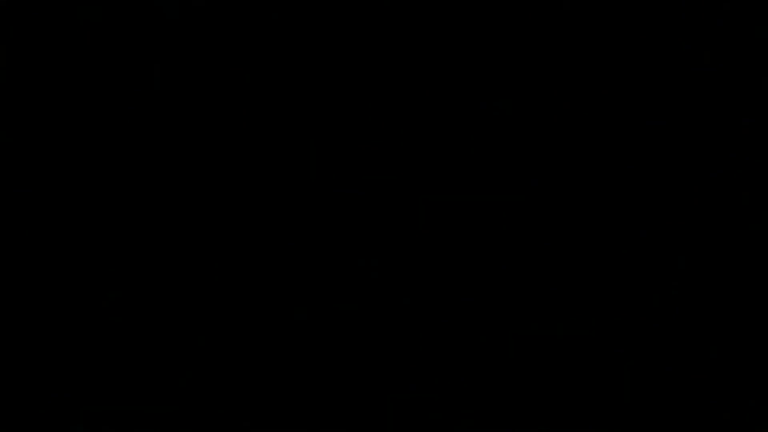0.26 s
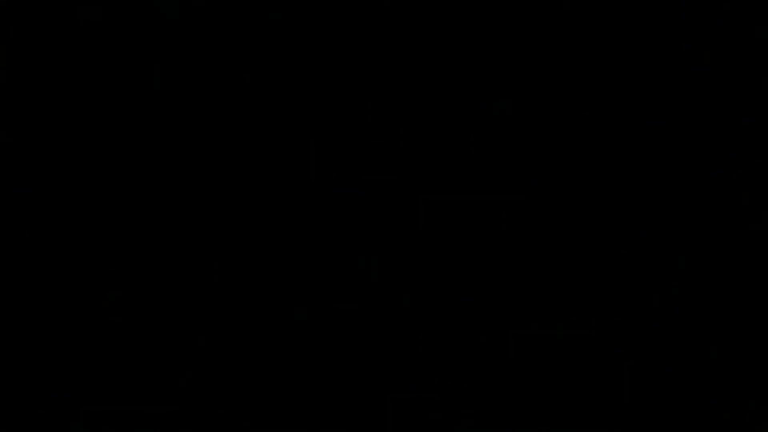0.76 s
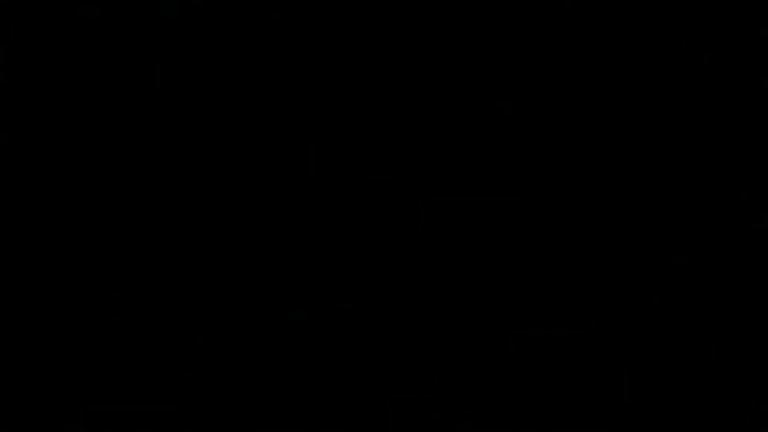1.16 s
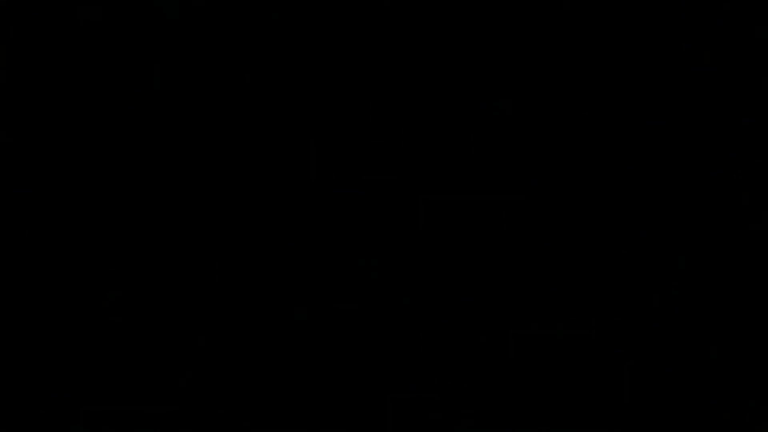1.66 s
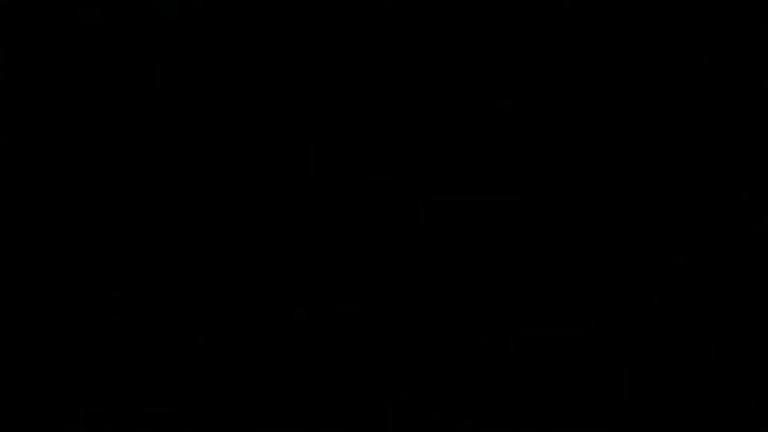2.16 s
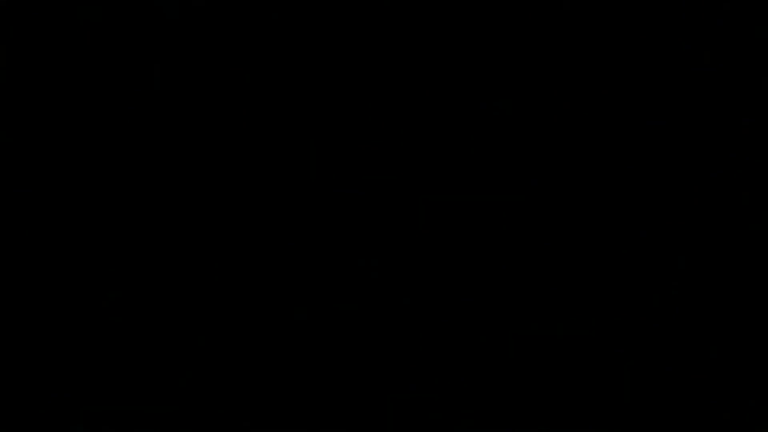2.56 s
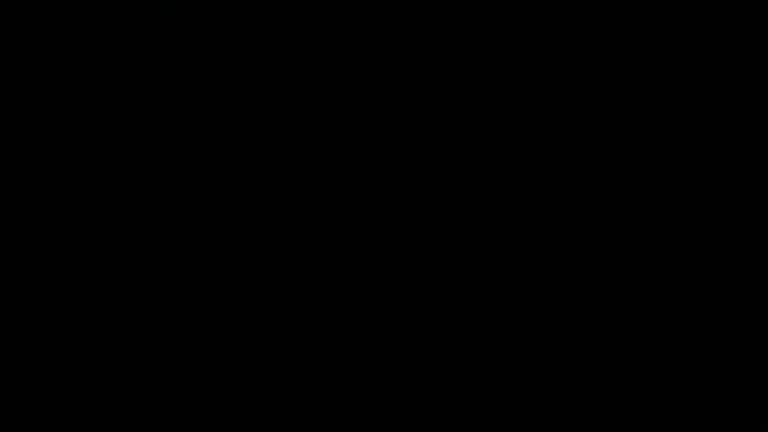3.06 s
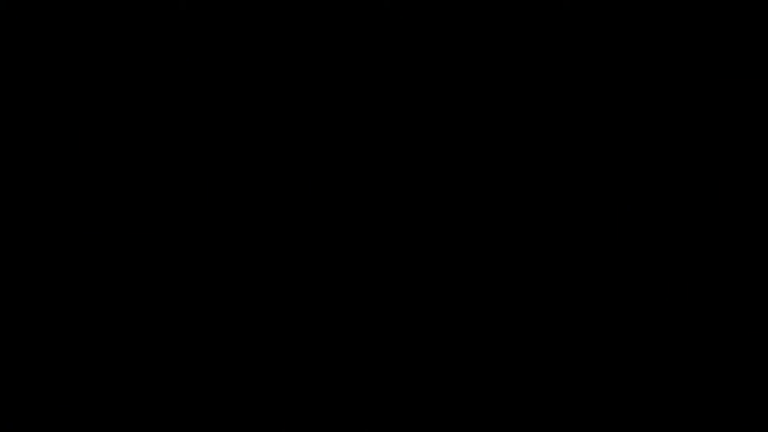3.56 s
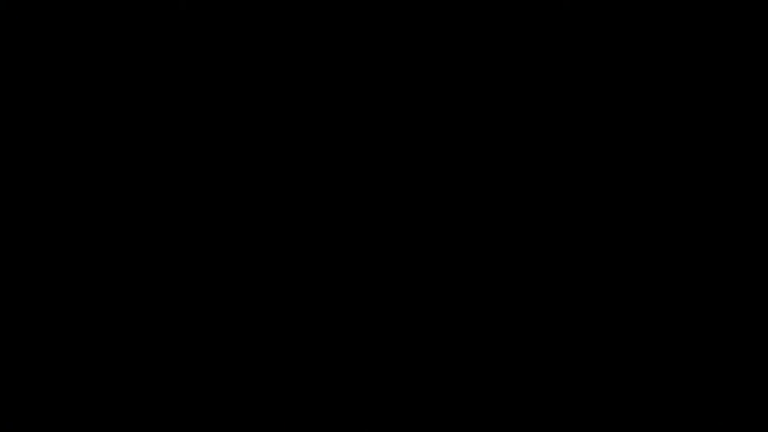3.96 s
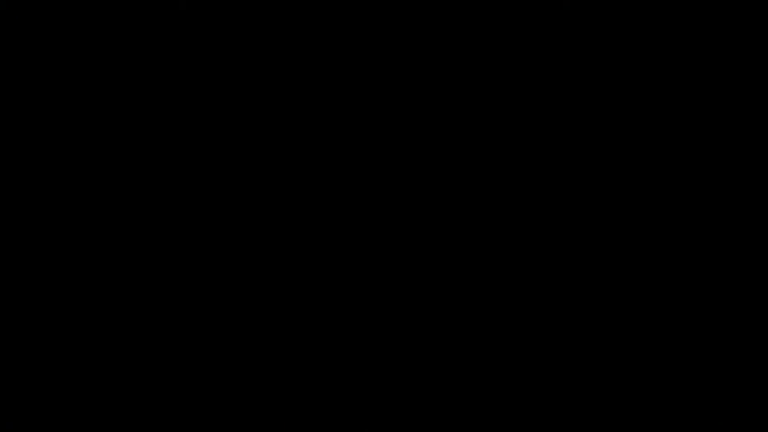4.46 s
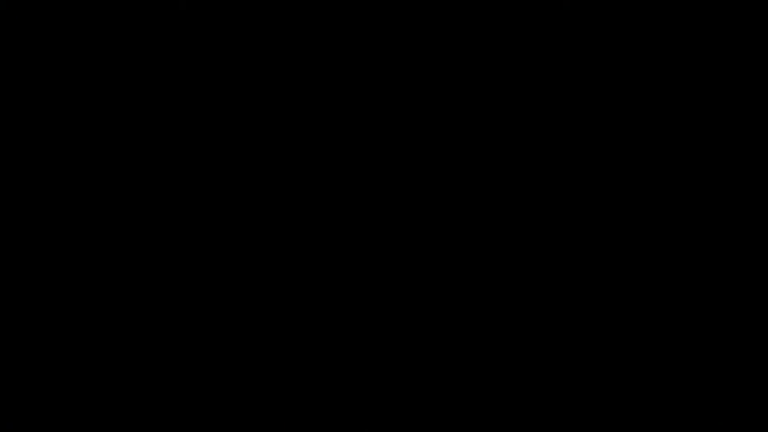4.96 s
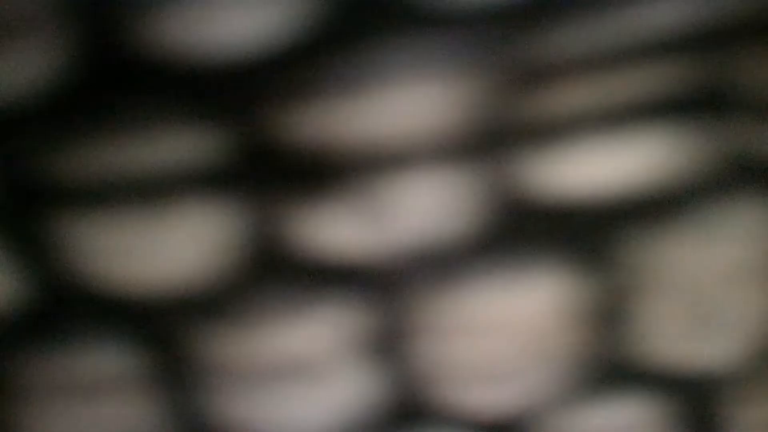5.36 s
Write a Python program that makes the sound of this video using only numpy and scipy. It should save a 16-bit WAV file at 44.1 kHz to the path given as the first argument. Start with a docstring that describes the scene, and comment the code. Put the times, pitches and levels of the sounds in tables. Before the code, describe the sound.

Close stereo recording in a small room. Plastic switch clicks and handling knocks come first, then a vacuum cleaner hums and whines upward. Suction squeals in rising, breathy whistles until a soft thump and gulp of air silence them, leaving roar and hiss. After about a second another puff and bump start a small engine, clattering and gulping about nine times a second to the end.

```python
"""Vacuum cleaner drives a toy air engine

In a small room, switch clicks (short rings and noise) come first, then mains hum (sines) and a motor
running up (sines tied to its speed, shaped noise). Rising suction whistles through gaps (gliding tones)
until the piston is pulled home with a thump. The flywheel is flicked and the engine runs at about nine
turns a second: gulps of air (noise swells), pressure pushes (pulses) and knocking links (short rings).
"""
import sys
import numpy as np
from scipy import signal
from scipy.fft import rfft, irfft, next_fast_len
from scipy.io import wavfile
from scipy.ndimage import map_coordinates

SR = 44100
rng = np.random.default_rng(int(sys.argv[2]) if len(sys.argv) > 2 else 0)


def wav_out(sig):
    """Save sig, one row per channel (or a flat mono array), as 16-bit PCM at SR to the path in sys.argv[1]."""
    wavfile.write(sys.argv[1], SR, np.round(np.clip(np.atleast_2d(sig).T, -1, 1) * 32767).astype(np.int16))


N = 246586
T = np.arange(N) / SR  # time of each sample, s
SIDES = np.array([[0.5], [-0.5]])  # shares a left-minus-right difference between the channels

TOP_HZ = 15900  # upper limit of the sound
POWER_S, LOADED_HZ = 0.7, 328  # the motor gets power; its full speed under the air load, turns a second

# The flywheel from its first turn. Each row: time in seconds, turns a second.
FLYWHEEL = [(3.229, 6.31), (3.32, 7.88), (3.41, 9.9), (3.5, 8.3), (4.0, 8.87), (4.17, 9.46), (4.65, 9.14),
            (5.6, 9.2)]
# The microphones turn past the engine. Each row: time in seconds, left minus right in dB.
VIEW = [(3.1, 0), (4.8, 0.5), (5.5, -5.5)]


def amp(db):
    """Decibels to gain."""
    return 10 ** (np.asarray(db) / 20)


def unit(x):
    """Scaled to rms 1."""
    return x / np.sqrt(np.mean(x ** 2) + 1e-20)


def along(points, hz):
    """Reads a curve of (Hz, value) points on a log pitch axis."""
    f, v = np.transpose(points)
    return np.interp(np.log(hz + 1), np.log(f + 1), v)


def curves(rows):
    """One value per sample for each column after the time."""
    s, *cols = np.transpose(rows)
    return [np.interp(T, s, c) for c in cols]


def wobble(rate, size=N):
    """A smooth random curve with rate random points a second."""
    points = rng.standard_normal(int(N * rate / SR) + 4)
    return map_coordinates(points, [np.arange(size) * rate / SR])


def step(x, centre, width):
    """A smooth step from 0 to 1."""
    return 0.5 + 0.5 * np.tanh((x - centre) / (2 * width))


def filtered(x, response):
    """Multiplies the spectrum of x by a response that depends on frequency."""
    m = next_fast_len(N + SR // 4)
    return irfft(rfft(x, m) * response(np.fft.rfftfreq(m, 1 / SR)), m)[..., :N]


def pan(left_db):
    """Gains of the two channels, left_db apart."""
    return amp(left_db * SIDES)


def from_left(x, lead):
    """The sound reaches the left microphone lead seconds before the right."""
    return filtered(x, lambda hz: np.exp(2j * np.pi * hz * lead * SIDES))


def white(alike, size=N):
    """Stereo white noise whose channels have the share alike in common."""
    share = np.clip(alike, 0, 1)
    common = np.sqrt(share) * rng.standard_normal(size)
    return common + np.sqrt(1 - share) * rng.standard_normal((2, size))


def noise(spectrum, alike):
    """Stereo noise of rms 1, coloured by (Hz, dB) points."""
    return unit(filtered(white(alike), lambda hz: amp(along(spectrum, hz))))


def add(track, s, sound):
    """Mixes a sound into the track at time s."""
    start = max(round(s * SR), 0)
    part = track[..., start:start + sound.shape[-1]]
    part += sound[..., :part.shape[-1]]


def swells(rows):
    """Sum of bell-shaped swells (s, half width s, height)."""
    track, t = np.zeros(N), np.arange(SR // 5) / SR - 0.1
    for s, width, height in rows:
        add(track, s - 0.1, height * np.exp(-0.5 * (t / width) ** 2))
    return track


def ring(modes, scatter, spread):
    """One blow sets off fading sines, with slightly new pitches and strengths, in each channel's own phase."""
    t = np.arange(SR // 6) / SR
    hz, db, t60 = np.transpose(modes)[..., None]
    hz = hz * (1 + scatter * rng.standard_normal(hz.shape))
    size = amp(db + 3 * rng.standard_normal(hz.shape) - 60 * t / t60)
    phase = rng.uniform(0, 2 * np.pi, hz.shape) + spread * rng.standard_normal((2, len(modes), 1))
    tones = (size * np.sin(2 * np.pi * hz * t + phase)).sum(1)
    return tones * (1 - np.exp(-t / 0.00064)) / np.linalg.norm(amp(db))


def struck(modes, hz, focus_db, reach):
    """The place of a blow favours the modes within about reach octaves of hz."""
    return [(f, db + focus_db * np.exp(-(np.log2(f / hz) / reach) ** 2), t60) for f, db, t60 in modes]


def lift(peaks, hz):
    """Gain of a tone that glides through (Hz, half width Hz, dB) resonances."""
    return 1 + sum(amp(db) / (1 + ((hz - centre) / width) ** 2) for centre, width, db in peaks)


def resonances(peaks, hz):
    """Response of (Hz, width Hz, dB) resonances."""
    return sum(amp(db) * 1j * hz * w / (c * c - hz * hz + 1j * hz * w) for c, w, db in peaks)


def shaft_speed():
    """Turns a second of the motor: it picks up softly and heads for its free speed until air load holds it."""
    pickup_s, soft_s, run_up_s, free_hz = 0.89, 0.1, 0.943, 345
    running = soft_s * np.logaddexp(0, (T - pickup_s) / soft_s)
    return np.minimum(free_hz * (1 - np.exp(-running / run_up_s)), LOADED_HZ)


def surge():
    """Gain of the airflow, which swells once."""
    middle_s, width_s, height_db = 2.53, 0.049, 2.5
    return amp(height_db * np.exp(-0.5 * ((T - middle_s) / width_s) ** 2))


def turns():
    """Adds up the flywheel's speed to find each time it comes round: (s, push dB, clatter dB, gulp dB)."""
    # How hard the engine works. Each row: time in seconds, push in dB, clatter in dB, gulp in dB.
    effort = [(3.23, -0.5, -3.5, 2.5), (3.36, 0, -1, 0), (3.47, 0.5, -1, 3), (3.82, 2, 1, 2.5),
              (4.3, 3.5, -0.5, 2.5), (5.2, 1, 3.3, 1.5), (5.55, 2, 1, -0.5)]
    first = round(FLYWHEEL[0][0] * SR)
    done = np.cumsum(curves(FLYWHEEL)[0][first:]) / SR
    at = first + np.searchsorted(done, np.arange(done[-1]))
    return list(zip(at / SR, *[db[at] for db in curves(effort)]))


def background():
    """A faint steady noise, strongest in the bass."""
    spectrum = [(30, -18), (100, -5), (200, -1.5), (500, -20), (2000, -22), (8000, -36)]
    return amp(-71.5) * noise(spectrum, alike=0.38)


def switch():
    """Handling and switch clicks: a plastic snap, the ring of the casing and a thud of the hollow shell."""
    # Each row: start in seconds, level in dB, thud in dB and snap in dB (both relative to the level),
    # time for the snap to fall 60 dB in seconds, pitch that rings most in Hz.
    clicks = [(0.13, -59.5, -11, -7, 0.046, 1500), (0.185, -26.5, -12, -30, 0.1, 1550),
              (0.215, -29.5, -13, -11.5, 0.063, 1600), (0.3, -25.5, -19, -4, 0.037, 1410),
              (0.478, -36, -5, 2, 0.045, 1370), (0.521, -23, -9, -14, 0.054, 1500),
              (0.526, -23.5, -29, -11, 0.028, 1100), (0.652, -33.5, -37, -13, 0.019, 1120),
              (0.667, -45, -25, -17, .025, 1080), (0.697, -37.5, -5, -15, 0.065, 1230),
              (0.719, -51.5, 4, -4, 0.061, 1200), (0.929, -41, -15, -7.5, 0.02, 1280)]
    # The casing's ringing pitches. Each row: pitch in Hz, level in dB, time to fall 60 dB in seconds
    # (before the extra damping below).
    casing = [(780, -4.5, 0.034), (958, -1, 0.11), (1166, -5, 0.064), (1438, -6.5, 0.066),
              (1650, -5.5, 0.054), (2040, -2, 0.038)]
    # The cleaner's hollow shell. Each row: pitch in Hz, level in dB, time to fall 60 dB in seconds.
    hollow = [(206, -5, 0.26), (254, -0.5, 0.049), (325, -6, 0.15), (403, -6.5, 0.081), (633, -7.5, 0.043)]
    # Colour of the snap. Each row: frequency in Hz, level in dB.
    snap_colour = [(100, -42), (500, -3.5), (1500, -1), (3200, 1), (5000, -11), (8000, -30.5), (15000, -40)]
    body, snaps, t = np.zeros((2, N)), np.zeros((2, N)), np.arange(SR // 10) / SR
    for s, db, thud_db, snap_db, snap_t60, hz in clicks:
        modes = struck(casing, hz, focus_db=6.5, reach=0.3)
        rattle = ring(modes, scatter=0.031, spread=0.75)[:, :len(t)] * amp(-350 * t)
        add(body, s, amp(db - 2) * pan(4.2) * rattle)
        add(body, s, amp(db + thud_db + 6.5) * ring(hollow, scatter=0.039, spread=0.2))
        add(snaps, s, amp(db + snap_db + 9) * white(0.5, size=len(t)) * amp(-60 * t / snap_t60))
    sound = body + pan(2.1) * filtered(snaps, lambda hz: amp(along(snap_colour, hz)))
    # small parts radiate little bass
    return filtered(from_left(sound, lead=0.00059), lambda hz: (1j * hz / (1j * hz + 90)) ** 2)


def mains_hum():
    """Mains current hums at steady pitches; the motor draws less of it at full speed."""
    # Each row: pitch in Hz, level in dB before it eases with speed.
    mains = [(100, -53), (200, -49.5)]
    ease_db = 6
    speed = shaft_speed() / LOADED_HZ
    hum = sum(amp(db - ease_db * speed + wobble(6.25)) * np.sin(2 * np.pi * hz * T) for hz, db in mains)
    fade_in = 1 - np.exp(-np.maximum(T - POWER_S, 0) / 0.3)
    return np.sqrt(2) * fade_in * hum


def shaft_tones():
    """The unbalanced rotor and the fan blades sound at multiples of the shaft's speed."""
    # Resonances the shaft passes through. Each row: pitch in Hz, half width in Hz, lift in dB.
    mounts = [(78, 11, 12), (230, 12, 3), (290, 31, 6)]
    # Fan blade tones. Each row: multiple of the shaft's speed, level in dB at full speed before the lift.
    orders = [(9, -52), (10, -55), (11, -57), (18, -60)]
    # The housing lifts tones gliding through it. Each row: pitch in Hz, half width in Hz, lift in dB.
    whine_peaks = [(2570, 46, 7.5), (3560, 50, 4)]
    shaft_hz = shaft_speed()
    speed = shaft_hz / LOADED_HZ
    angle = 2 * np.pi * np.cumsum(shaft_hz * (1 + 0.00211 * wobble(14))) / SR
    # the rotor's shake grows with the square of speed
    shake = amp(-48.5) * speed ** 2 * lift(mounts, shaft_hz)
    shaft = shake * amp(0.79 * wobble(6.8)) * np.sin(angle)
    # twice the shaft's pitch booms as it sweeps through the shell's resonance at 235 Hz
    boom = amp(-55.5) * np.sin(2 * angle) / np.hypot(1, (2 * shaft_hz - 235) / 22)
    boom = boom * step(T, POWER_S, 0.02)
    whine = np.zeros(N)
    for k, db in orders:
        level = amp(db + 1.5 * wobble(20)) * lift(whine_peaks, k * shaft_hz)
        whine += speed ** 3 * level * np.sin(round(k) * angle)
    return np.sqrt(2) * (pan(-6.5) * shaft + boom + whine)


def fan_roar():
    """Fan noise resounds in the ducts and brightens with speed; it climbs as the fan takes hold."""
    # Colour of the rushing air. Each row: frequency in Hz, level in dB.
    roar_colour = [(380, -21), (470, -14.5), (720, -5.5), (950, -7), (1500, -8), (2150, -3), (2750, -11.5),
                   (3300, -11.5), (4000, -7), (4800, -13.5), (5600, -8.5), (6400, -45), (12000, -55)]
    # Hose and fan housing. Each row: pitch in Hz, width in Hz, level in dB.
    ducts = [(1479, 51, 4), (1720, 19, 1), (2396, 60, 1.5), (3030, 23, 0), (3390, 16, -3), (4460, 28, -2.5),
             (5852, 60, -1)]
    # Low drone. Each row: frequency in Hz, level in dB.
    drone_colour = [(25, -53), (60, -17), (100, -9), (140, -11), (210, 9.5), (280, -6), (380, -11),
                    (600, -68)]
    shell_colour = [(300, -7), (460, -4.5), (620, -5), (950, -4), (1500, -7), (2000, -14), (3000, -16),
                    (5000, -49)]
    level_db, climb_db, ease_db = -32.5, 33, 4.5  # it eases with speed as the suction builds
    grip_speed, grip_width = 0.29, 0.093  # where it climbs, as shares of full speed
    bright_hz, bright_power = 4600, 1.3  # above this pitch the air noise grows as a further power of speed
    speed = shaft_speed() / LOADED_HZ
    # the ducts resound less once the engine runs
    duct_db = 3 - 3.5 * step(T, FLYWHEEL[2][0], 0.1)
    duct_noise = unit(filtered(white(0.083), lambda hz: resonances(ducts, hz)))
    air = speed * (amp(3.5) * noise(roar_colour, alike=0.89) + amp(duct_db) * speed ** 0.88 * duct_noise)
    dull = filtered(air, lambda hz: 1 / (1 + (hz / bright_hz) ** 8))
    air = dull + (air - dull) * speed ** bright_power
    shell = amp(-4) * (1 - speed) * noise(shell_colour, alike=0.92)  # it drums at low speed
    drone = amp(-4.5) * speed * noise(drone_colour, alike=0.9)
    roar_db = level_db - climb_db * (1 - step(speed, grip_speed, grip_width)) - ease_db * speed
    gain = amp(roar_db) * surge() * step(T, POWER_S, 0.02) * amp(1.5 * wobble(7.2))
    return gain * (pan(4.8) * from_left(air + shell, lead=0.000647) + drone)


def whistle(start, peak, end, hz, power, db, octave_db, rough):
    """An edge tone and its octave follow the shaft's speed; turbulence smears the rough share of them."""
    swell_db, fade_db, break_s = 11, 12, 0.0054  # rise to the peak, fall after it, time to speak or break off
    width, jitter = 0.08, 0.008  # smear and pitch wander of a fully rough whistle, as shares of its pitch
    span = slice(round(start * SR), round(end * SR))
    t, shaft_hz, rough = T[span], shaft_speed(), np.clip(rough, 0, 1)

    def flutter(rate):
        return wobble(rate, size=len(t))

    def shake():
        smear = flutter(width * hz) + 1j * flutter(width * hz)
        return np.sqrt(2 - 2 * rough ** 2) + rough * smear

    pitch = hz * (shaft_hz[span] / shaft_hz[round(peak * SR)]) ** power
    phase = 2 * np.pi * np.cumsum(pitch * (1 + jitter * rough * flutter(200))) / SR
    octave = amp(octave_db) * (2 * pitch < TOP_HZ) * shake() * np.exp(2j * phase)
    tone = shake() * np.exp(1j * phase) + octave
    gate = np.clip(np.minimum(t - start, end - t) / break_s, 0, 1)
    before_db = swell_db * ((peak - t) / (peak - start)) ** 2
    after_db = fade_db * ((t - peak) / (end - peak)) ** 2
    return amp(db - np.where(t < peak, before_db, after_db)) * gate * tone.real


def whistles():
    """Rising suction drives the gaps through ever higher edge tones; the earliest glide is a thin whine of the
    motor rising with its speed."""
    # Each row: start, peak and end in seconds, pitch at the peak in Hz, power of shaft speed that the
    # pitch follows (small where a cavity holds it), level in dB, octave in dB relative to the tone,
    # roughness from 0 to 1.
    rows = [(1.03, 1.18, 1.215, 4820, 1, -63, -30, 0.6), (1.205, 1.225, 1.245, 5880, .7, -60, -45, .5),
            (1.283, 1.3, 1.315, 3870, 1.1, -47, -35, .2),
            (1.323, 1.436, 1.487, 5090, 0.84, -28.5, -46, 0.13),
            (1.36, 1.45, 1.49, 2590, 0.78, -40, -21, 0.4), (1.37, 1.436, 1.52, 7600, 0.74, -59, -30, .2),
            (1.47, 1.51, 1.588, 2850, 1.1, -31, -2.5, 0.35),
            (1.565, 1.605, 1.64, 3020, 1.29, -27, -16, 0.6),
            (1.57, 1.75, 1.795, 3640, 1.2, -28.5, -17, 0.99),
            (1.605, 1.705, 1.79, 3315, 0.317, -21.5, -30, 0.31),
            (1.56, 1.62, 1.82, 8950, 1.05, -52, -25, 0.7), (1.55, 1.7, 1.8, 8500, 1.2, -50, -19, 1),
            (1.5, 1.69, 1.82, 13250, .8, -52, -30, 1), (1.68, 1.78, 1.86, 14900, .6, -54, -30, 1),
            (1.78, 1.88, 1.925, 9830, 1.9, -42, -30, 0.7), (1.72, 1.81, 1.88, 11170, 1.7, -43, -30, .85),
            (1.84, 1.91, 1.965, 12900, 3.3, -42, -30, .6), (1.77, 1.9, 1.96, 3650, 1, -43, -25, 1)]
    # Brief high pips, and a short tick during the engine run. Each row: middle in seconds, half width in
    # seconds, pitch in Hz, level in dB.
    chirp_rows = [(1.316, 0.0031, 4940, -43), (1.6, 0.0021, 4600, -28), (5.359, 0.00025, 5140, -16),
                  (5.365, 0.00014, 6400, -19)]
    tones = np.zeros(N)
    for row in rows:
        add(tones, row[0], whistle(*row))
    # a strong jet swings unevenly, which adds octaves and sum tones
    overtones = filtered(tones ** 2, lambda hz: (hz > 7000) * 0.36)
    chirps = sum(swells([(s, width, amp(db))]) * np.sin(2 * np.pi * hz * T)
                 for s, width, hz, db in chirp_rows)
    return pan(7.2) * from_left(tones + overtones + np.sqrt(2) * chirps, lead=0.00059)


def leak():
    """Air hisses through a leak, faintly at first, then fully once the piston is home and seals the cylinder."""
    # Colour of the hiss. Each row: frequency in Hz, level in dB.
    leak_colour = [(3000, -24), (6000, 0.5), (9000, -6.5), (12000, -2), (15500, 3.5)]
    seal_s, seal_rise_s, onset_speed = 1.96, 0.012, 0.47  # the onset is a share of full speed
    speed = shaft_speed() / LOADED_HZ
    gain = amp(-46.5) * step(T, seal_s, seal_rise_s) + amp(-70) * step(speed, onset_speed, 0.03)
    return gain * surge() * pan(-9.5) * noise(leak_colour, alike=0.071)


def ports():
    """Air is gulped through the ports at each turn, resounds in the cylinder and hisses past the valve."""
    # Rushes as the piston is pulled home and the flywheel flicked.
    # Each row: middle in seconds, half width in seconds, level in dB.
    rushes = [(1.961, 0.026, -25.5), (1.995, 0.012, -20), (3.074, 0.0022, -29), (3.123, 0.012, -20),
              (3.148, 0.038, -23.5)]
    # Air drawn through the ports. Each row: delay in the turn in seconds, half width in seconds,
    # gulp in dB, hiss in dB.
    gulps = [(-.024, 0.018, -48.5, -42.5), (-.009, 0.0077, -22, -39), (0.025, 0.01, -31, -46.5),
             (.049, .007, -21.5, -44), (0.064, 0.02, -27, -38)]
    # Colour of the gulps. Each row: frequency in Hz, level in dB.
    port_colour = [(40, -64), (160, -15.5), (330, -1.5), (550, -10), (780, -8), (1050, 1), (1650, 0),
                   (2300, -4.5), (3100, -2.5), (4200, -10), (5300, -12), (7500, -28.5), (15000, -77)]
    # Colour of the hiss. Each row: frequency in Hz, level in dB.
    jet_colour = [(1500, -33), (3000, 6.5), (5200, 12.5), (7500, 5.5), (11000, 3.5), (15500, 3)]
    # The cylinder's cavity. Each row: pitch in Hz, width in Hz, level in dB.
    port_modes = [(1300, 87, 3.5), (2967, 210, 0.5)]
    # How strongly the cavity resounds in the gulps. Each row: time in seconds, level in dB.
    cavity_level = [(2.0, -7), (3.13, -4), (4.1, -11.5), (5.5, -17.5)]
    gulp_rows, hiss_rows = [], []
    for s, _, _, effort_db in turns():
        for delay, width, gulp_db, hiss_db in gulps:
            gulp_rows.append((s + delay, width, amp(effort_db + gulp_db + rng.normal(0, 1))))
            hiss_rows.append((s + delay, width, amp(hiss_db + rng.normal(0, 2.8))))
    gulp, hiss = swells(gulp_rows), swells(hiss_rows)
    rush = swells([(s, width, amp(db)) for s, width, db in rushes])
    flow = (pan(-0.26) * gulp + pan(2.2) * rush) * amp(1.96 * wobble(450) - 2.8)

    def low(hz):
        return 1 / (1 + (hz / 2200) ** 4)

    def colour():
        return amp(1 * (wobble(28) + 0.16))  # chance changes of about 1 dB, 28 a second

    dull = filtered(noise(port_colour, alike=0.61), lambda hz: np.sqrt(low(hz)))
    bright = filtered(noise(port_colour, alike=0.13), lambda hz: np.sqrt(1 - low(hz)))
    cavity_noise = unit(filtered(white(0.38), lambda hz: resonances(port_modes, hz)))
    cavity = amp(curves(cavity_level)[0]) * cavity_noise
    # off the axis of the ports their treble fades
    air = dull * colour() + bright * colour() * amp(curves(VIEW)[0]) + cavity
    jet = (hiss + amp(-21) * rush) * pan(-5.5) * amp(0.5) * noise(jet_colour, alike=0.027)
    return flow * air + jet


def piston():
    """Each swap of the valve pushes the air and shakes the board; pulled home by hand, the piston thumps."""
    # The piston meets its stop. Each row: start in seconds, level in dB.
    bumps = [(1.982, -25.5), (3.104, -29)]
    # The valve swaps the cylinder between suction and open air. Each row: delay in the turn in seconds,
    # half width in seconds, signed pressure (a relative height).
    pushes = [(-.004, 0.002, -0.088), (0, 0.0012, 0.17), (0.0309, 0.002, 0.13), (.033, .0022, -.12),
              (.047, 0.00088, -0.11)]
    # The board under the engine. Each row: pitch in Hz, level in dB, time to fall 60 dB in seconds
    # when no hand damps it.
    base = [(72, 2, 0.61), (142.4, 5, 0.3), (344, 11, 0.029), (1056, 13.5, 0.043)]
    board, thumps, push_rows = np.zeros((2, N)), np.zeros((2, N)), []
    held = amp(-60 * np.arange(SR // 6) / SR / 0.14)  # the hand damps the board
    for s, db in bumps:
        add(thumps, s, amp(db + 11.5) * held * ring(base, scatter=0.13, spread=0.11))
    for s, db, _, _ in turns():
        add(board, s, amp(db - 22) * ring(base, scatter=0.092, spread=0.065))
        push_rows += [(s + delay, width, height * amp(db)) for delay, width, height in pushes]
    dull_thumps = filtered(thumps, lambda hz: 1 / (1 + 1j * hz / 160))
    pressure = filtered(swells(push_rows), lambda hz: 1j * hz / (1j * hz + 10))
    return board + dull_thumps + pressure


def links():
    """Crank and valve knock in the same order every turn; the rod's slaps ring out over them."""
    # Slack links are taken up. Each row: delay in the turn in seconds, level in dB.
    knocks = [(-.014, -4), (-.009, -5), (.001, -3), (.030, -6.5), (0.0451, -6.5)]
    # The rod slaps as its load reverses; a few rows are hard knocks that come before a turn. Each row: start in
    # seconds, level in dB, pitch that rings most in Hz.
    slaps = [(3.2506, -6.5, 1380), (3.3872, -5.5, 1230), (3.457, -7.5, 1370), (3.6969, -11, 1320),
             (3.8422, -3, 1250), (3.9567, -5.5, 1150), (4.0714, -8, 1188), (4.1772, -1.5, 1330),
             (4.2834, -3.5, 1330), (4.361, -7, 1310), (4.3897, -3, 1280), (4.4677, -8, 1290),
             (4.6082, -7, 1150), (4.8254, -9, 1400), (4.9057, -12, 1250), (5.0425, -9, 1090),
             (5.1343, -8, 1310), (5.154, -11, 1270), (5.263, -9, 1160), (5.3707, -5, 1300),
             (5.479, -12, 1380)]
    # The engine's frame. Each row: pitch in Hz, level in dB, time to fall 60 dB in seconds
    # (slaps are damped further below).
    frame = [(1049, -4.5, 0.036), (1164, -3, 0.084), (1265, 4, 0.024), (1301, 1, 0.1), (1477, 3.5, 0.043),
             (1755, -1.5, 0.019), (1988, -2.5, 0.044), (2550, -11, 0.051), (4140, -14.5, 0.058),
             (5270, -11, 0.01)]
    track = np.zeros((2, N))
    for s, _, clatter_db, _ in turns():
        for delay, db in knocks:
            gain = amp(clatter_db + db - 10 + rng.normal(0, 1))
            late = rng.normal(0, 0.000984)
            add(track, s + delay + late, gain * ring(frame, scatter=0.046, spread=0.73))
    damping = amp(-450 * np.arange(SR // 6) / SR)
    for s, db, hz in slaps:
        modes = struck(frame, hz, focus_db=5.5, reach=0.11)
        add(track, s, amp(db - 1.5) * ring(modes, scatter=0.041, spread=0.42) * damping)
    return pan(-1.4) * track


def room(x):
    """Echoes off the walls: fading noise as a short diffuse tail, different at each microphone."""
    # Each row: frequency in Hz, time to fall 60 dB in seconds.
    decay = [(150, 0.67), (1500, 0.38), (4000, 0.35), (12000, 0.53)]
    hz, t, z = signal.stft(rng.standard_normal((2, SR // 3)), SR, nperseg=256)
    fading = z * amp(-60 * t / along(decay, hz)[:, None])
    tail = signal.istft(fading, SR, nperseg=256)[1]
    return signal.fftconvolve(x, tail / np.linalg.norm(tail[0]), axes=1)[:, :N]


def scene():
    """Cleaner and engine in the room, over a faint background."""
    # The engine radiates unevenly. Each row: frequency in Hz, left minus right in dB.
    engine_side = [(280, -3), (500, 0), (1100, 2), (2000, -3.5), (4000, -1)]
    clicks, tones = switch(), whistles()
    engine = filtered(ports() + links(), lambda hz: pan(along(engine_side, hz)))
    engine = pan(curves(VIEW)[0]) * engine
    echoes = room(amp(-10) * clicks + amp(-12) * engine + amp(-15) * tones)
    motor = mains_hum() + shaft_tones() + fan_roar() + leak()
    return background() + clicks + motor + tones + engine + piston() + echoes


def record(dry):
    """Nothing is kept above the upper limit, give or take 100 Hz."""
    return filtered(dry, lambda hz: np.clip((TOP_HZ - hz) / 200 + 0.5, 0, 1))


dry = scene()
out = record(dry)
wav_out(out)
```